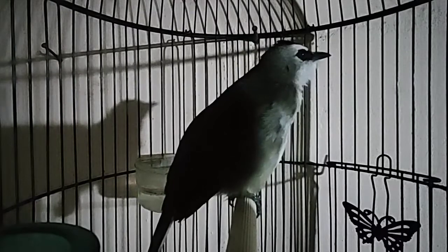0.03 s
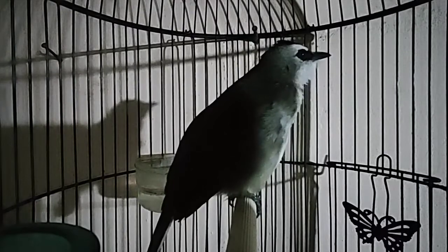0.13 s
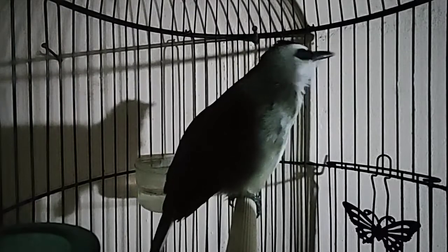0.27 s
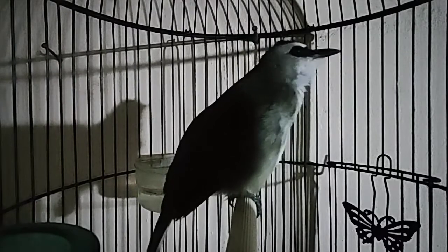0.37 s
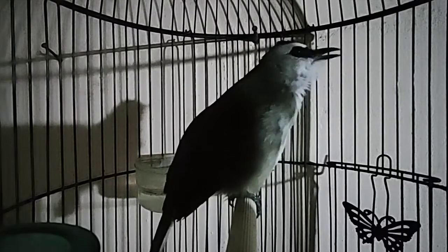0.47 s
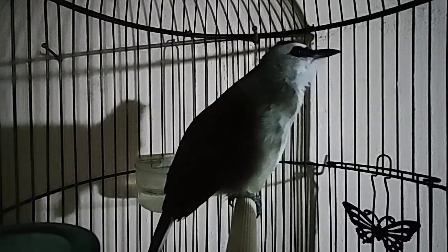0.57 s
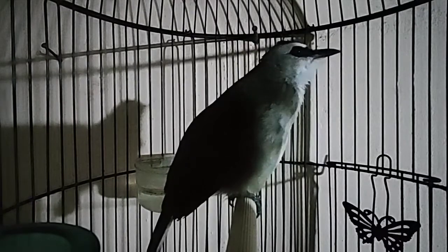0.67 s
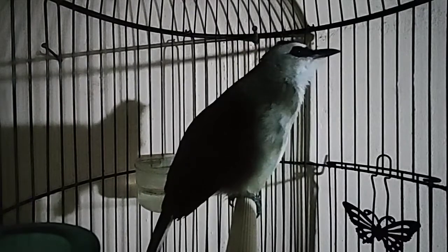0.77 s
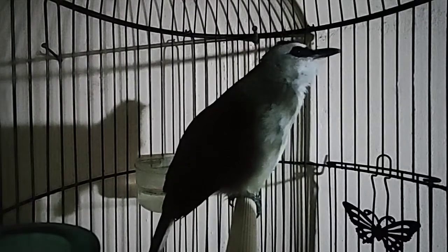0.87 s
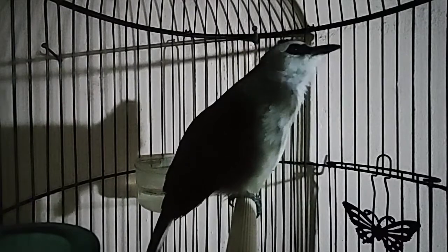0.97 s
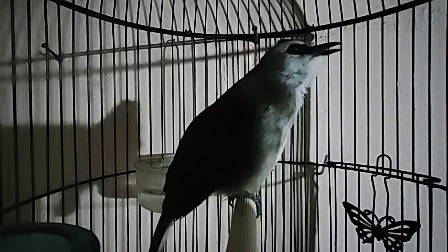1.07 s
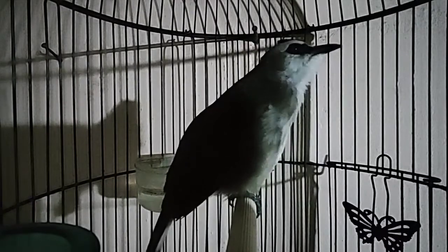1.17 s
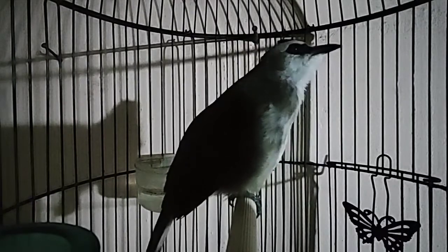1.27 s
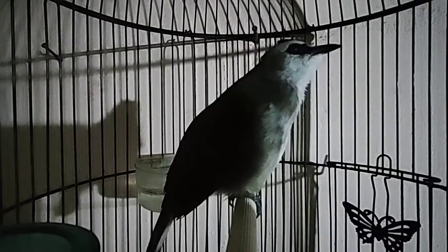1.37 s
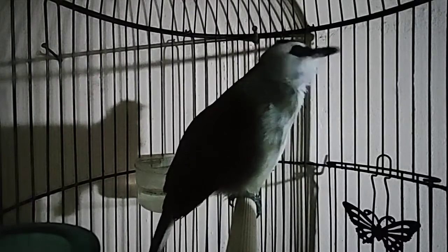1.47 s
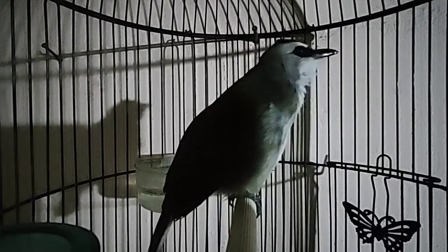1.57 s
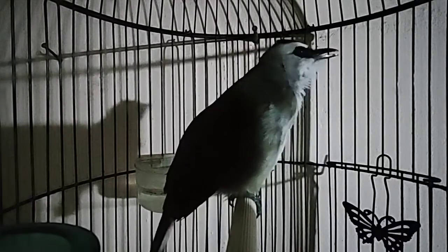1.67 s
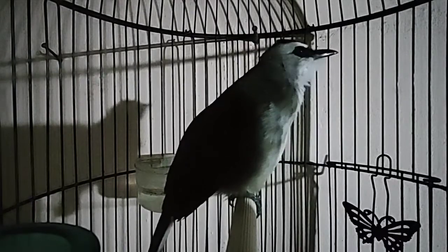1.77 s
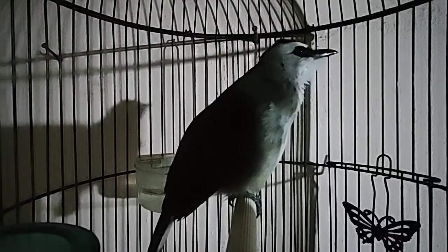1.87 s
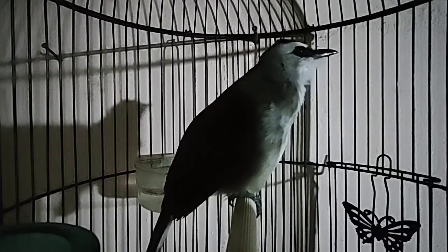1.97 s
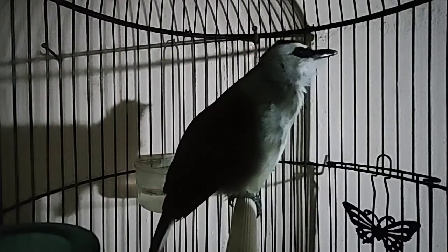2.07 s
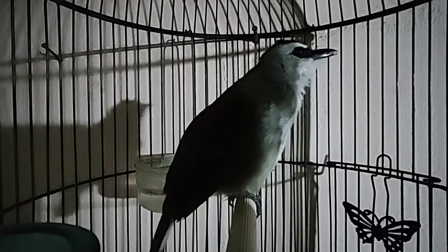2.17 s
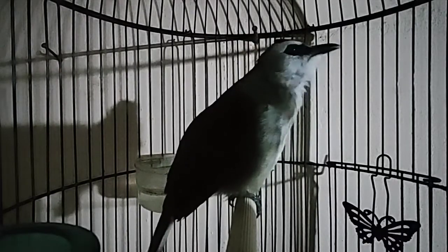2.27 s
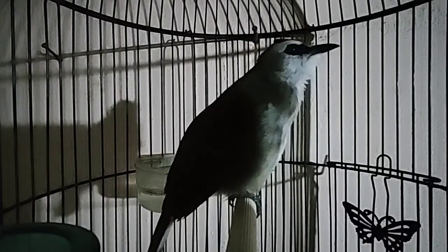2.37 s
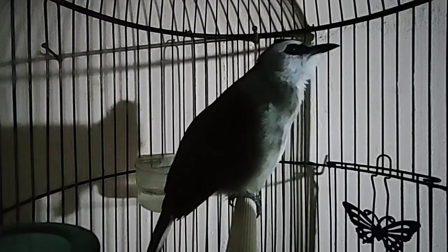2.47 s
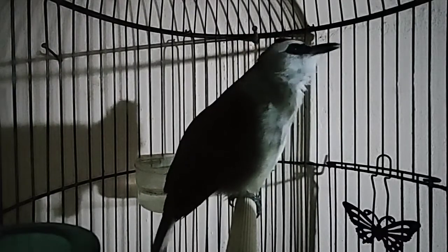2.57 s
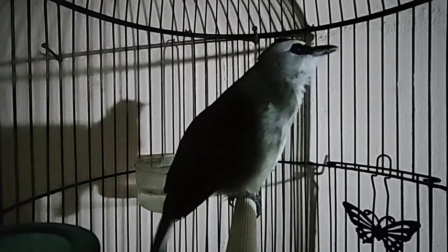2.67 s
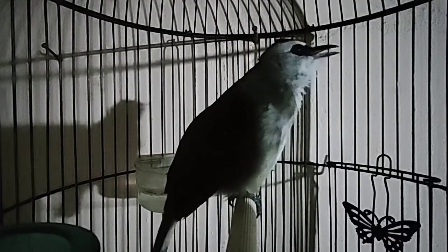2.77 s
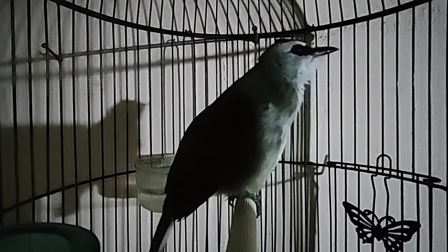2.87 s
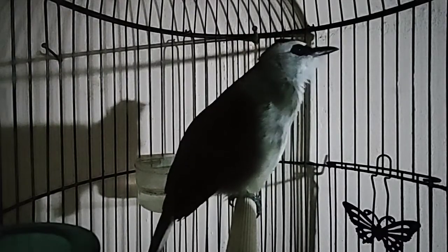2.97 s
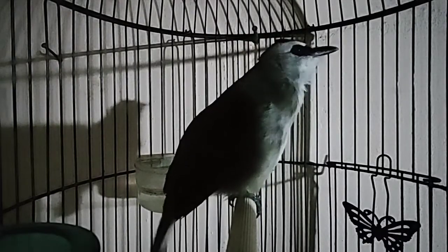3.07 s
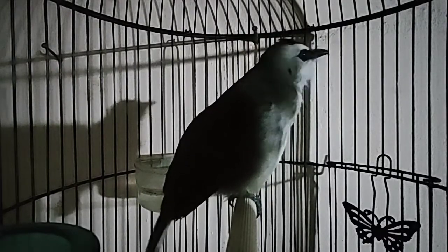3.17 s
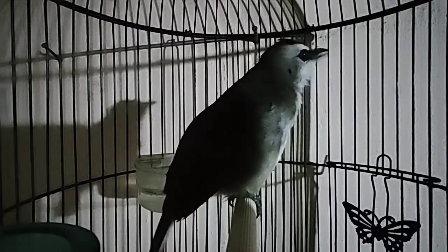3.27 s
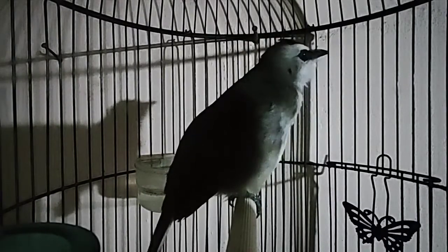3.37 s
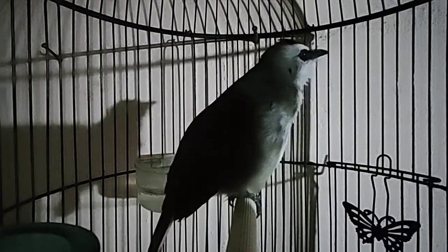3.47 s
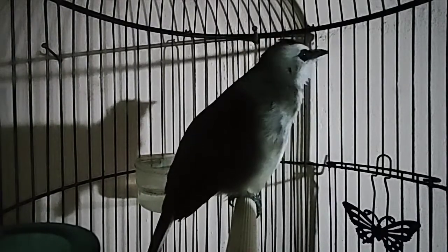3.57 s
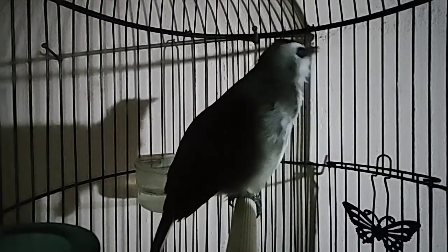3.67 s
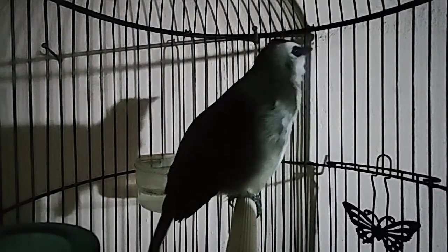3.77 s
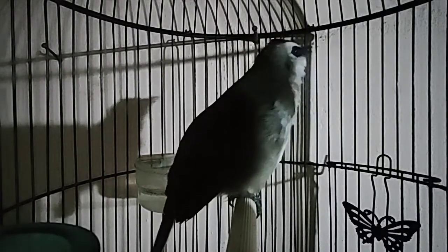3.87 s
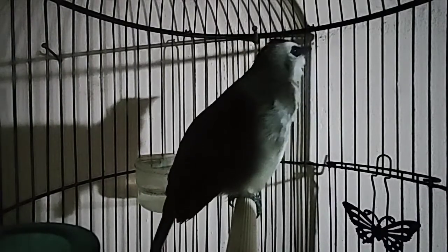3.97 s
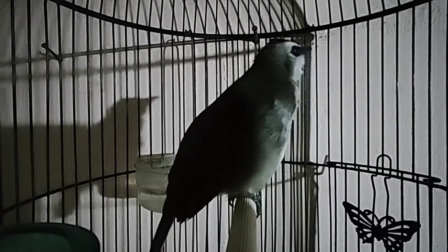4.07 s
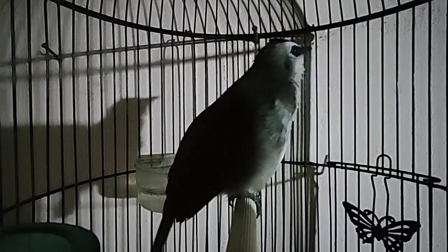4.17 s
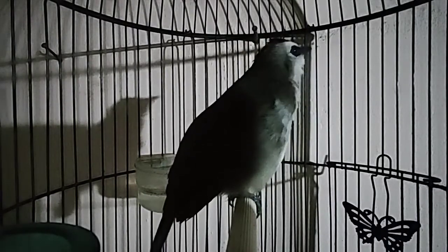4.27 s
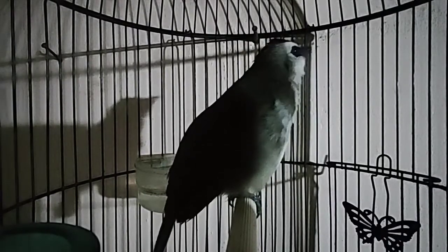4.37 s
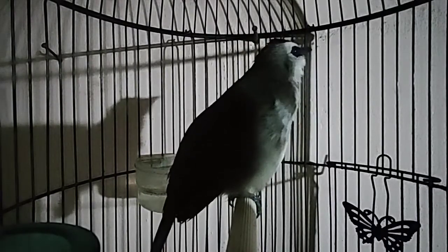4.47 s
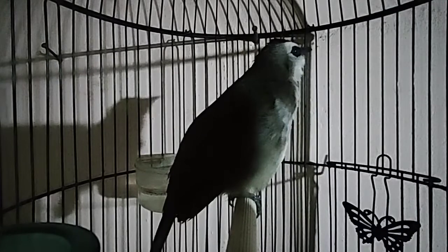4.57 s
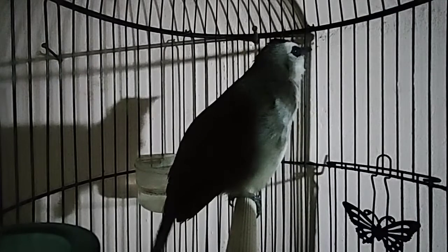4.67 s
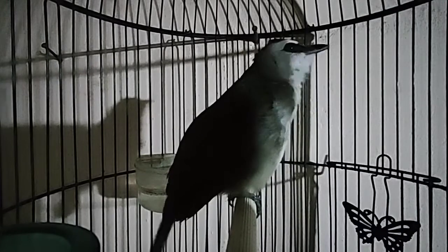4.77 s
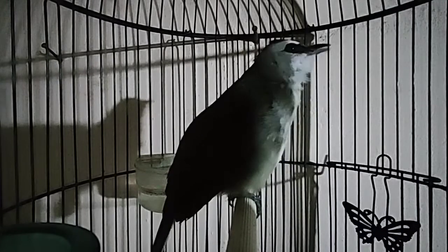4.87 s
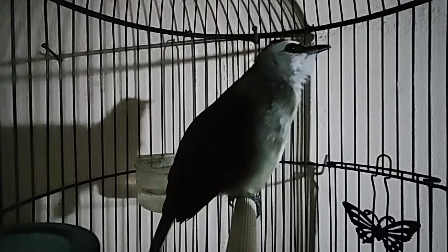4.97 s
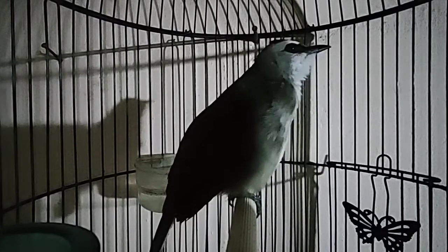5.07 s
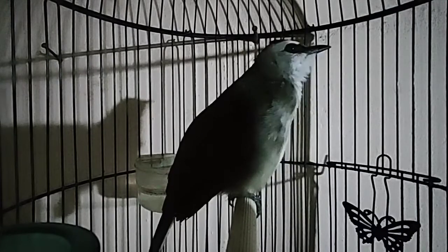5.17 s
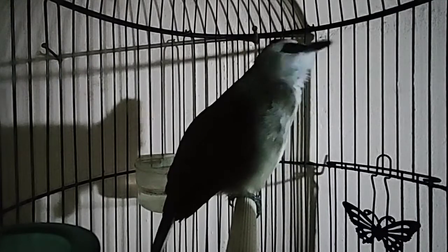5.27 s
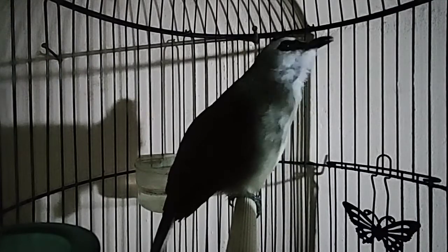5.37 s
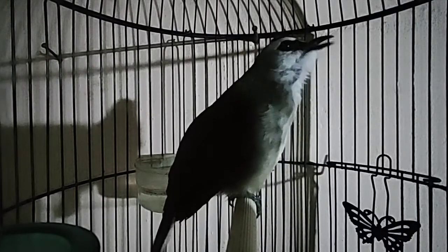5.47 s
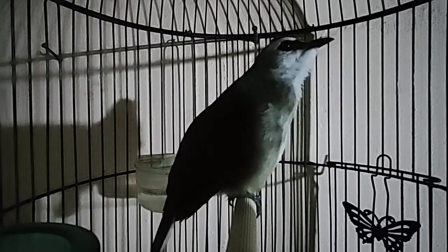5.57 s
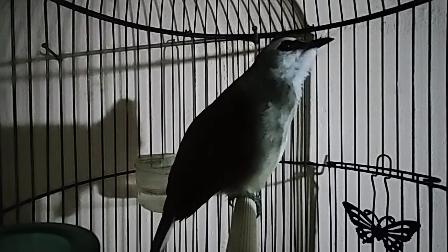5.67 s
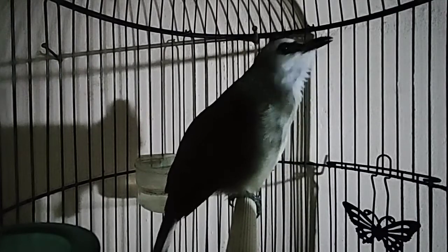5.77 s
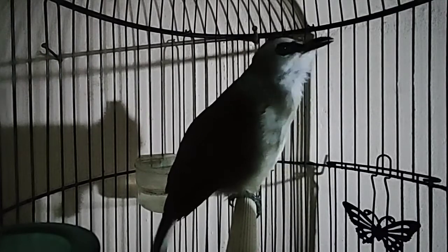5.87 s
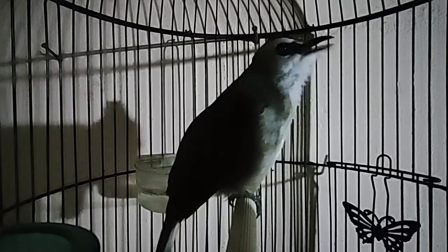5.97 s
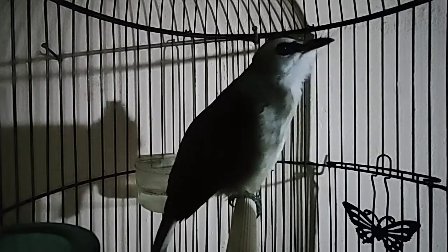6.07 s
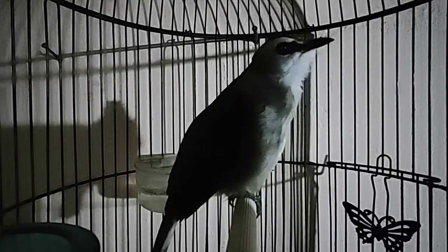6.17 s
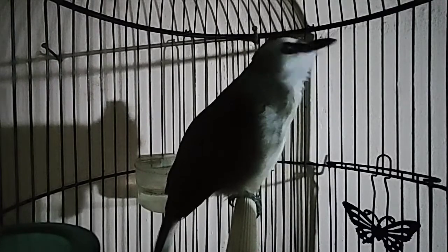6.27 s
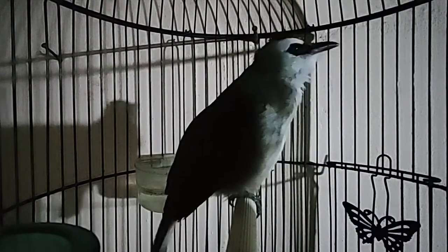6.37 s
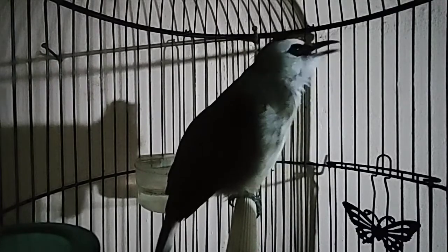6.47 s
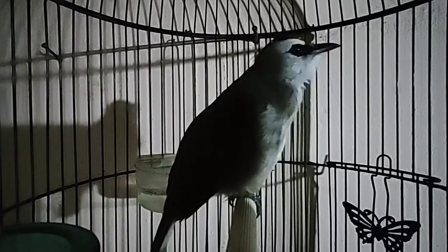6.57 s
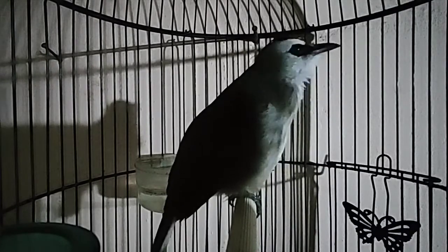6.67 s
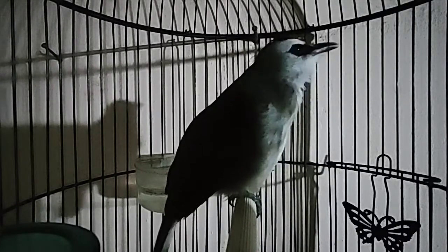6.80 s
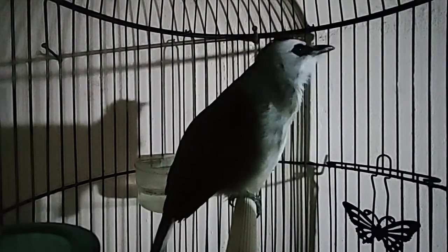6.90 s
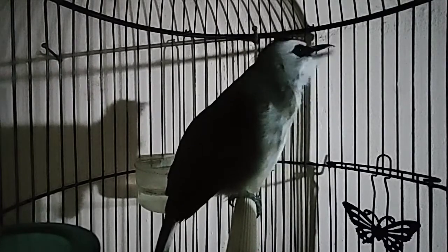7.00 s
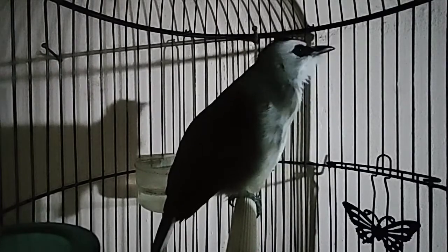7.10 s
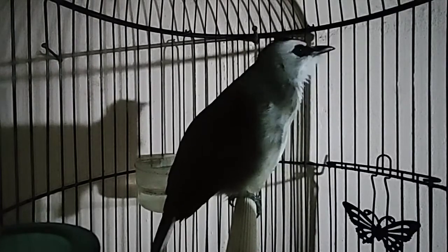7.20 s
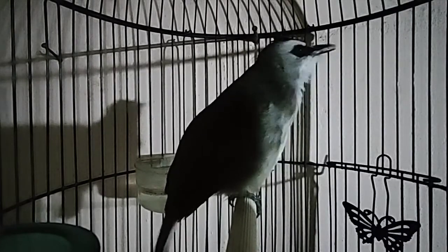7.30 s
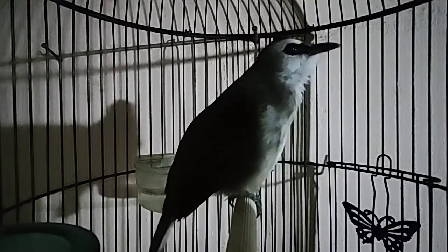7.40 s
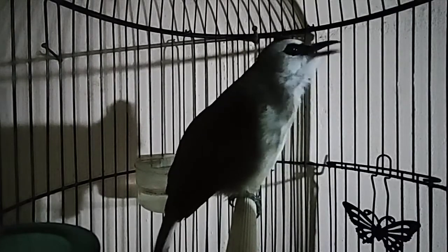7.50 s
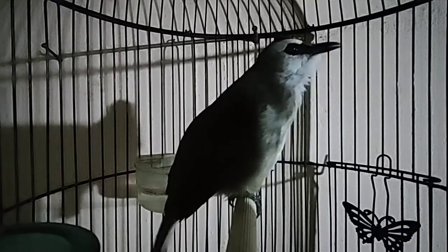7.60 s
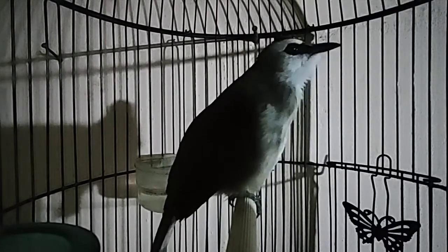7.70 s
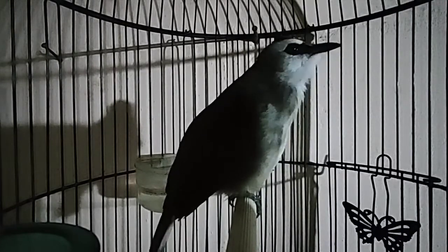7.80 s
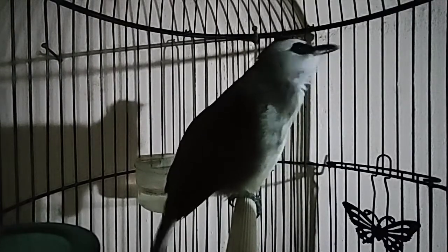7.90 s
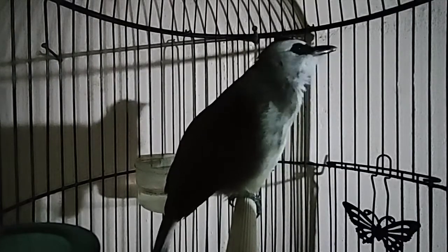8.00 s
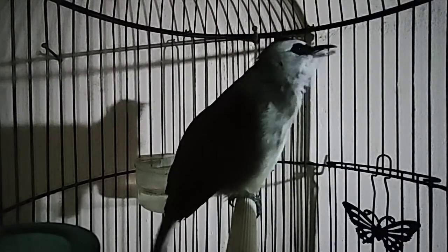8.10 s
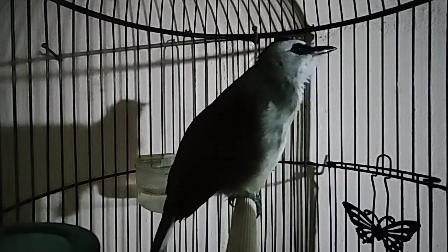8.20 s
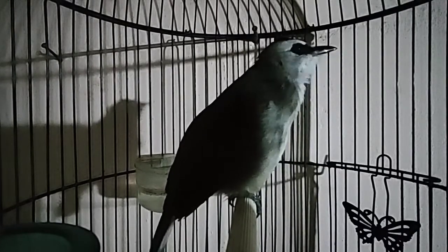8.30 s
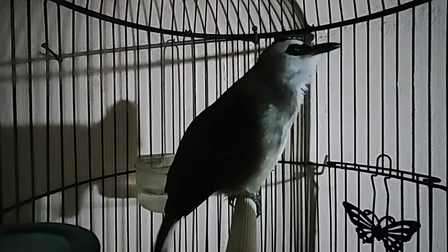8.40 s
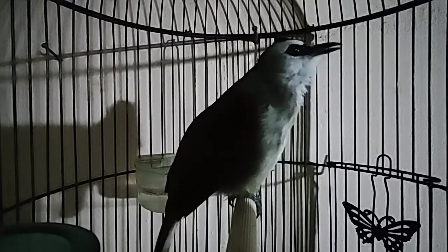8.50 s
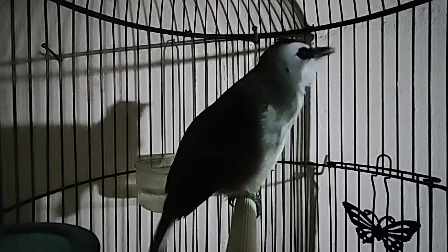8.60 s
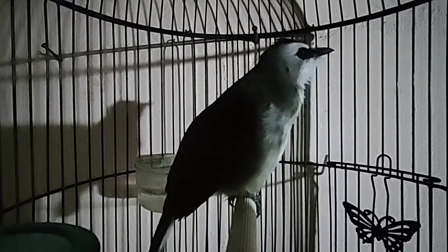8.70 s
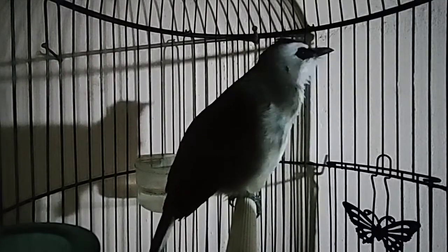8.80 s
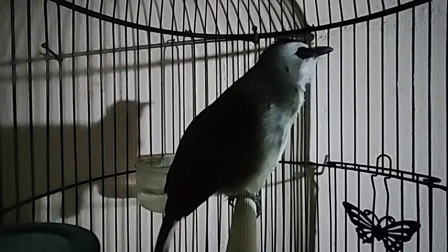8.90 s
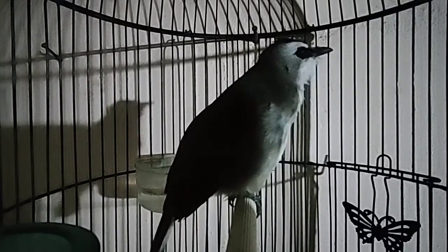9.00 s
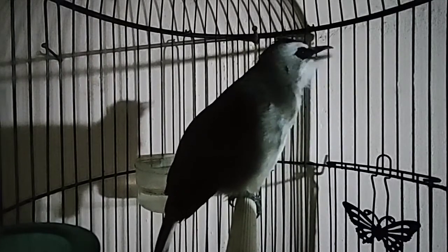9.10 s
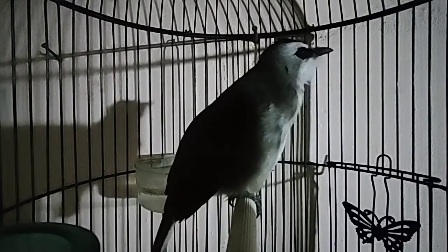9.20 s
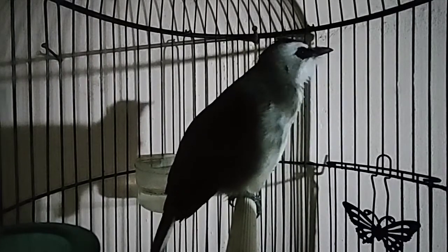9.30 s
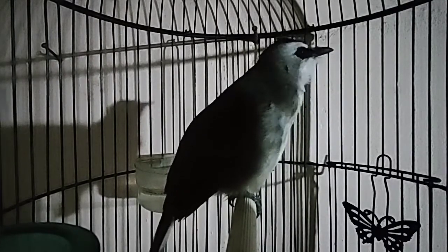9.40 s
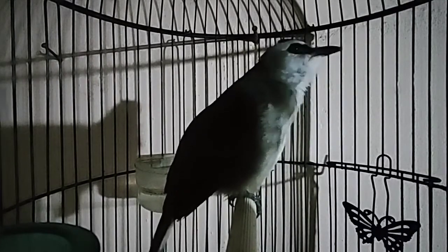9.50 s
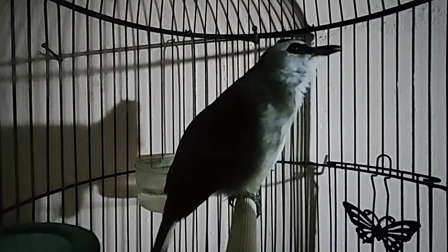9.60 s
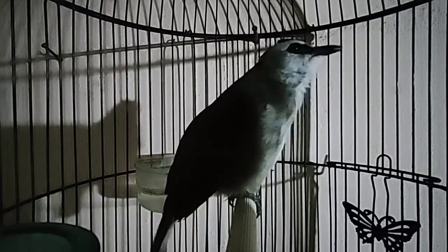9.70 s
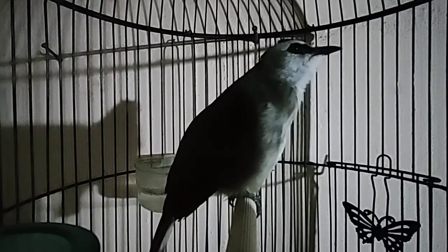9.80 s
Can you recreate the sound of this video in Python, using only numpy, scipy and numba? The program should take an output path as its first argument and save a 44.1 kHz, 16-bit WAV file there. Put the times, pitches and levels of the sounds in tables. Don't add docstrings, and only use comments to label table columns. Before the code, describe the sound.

A caged songbird sings very close to a phone in a bare room at night. A loud high whistle is already sounding, then softer low slurs and loud high notes alternate without a break, nearly four notes a second, each shaking into a quick warble. Beneath lie low hum, faint hiss and a single-cylinder motorbike thudding outside near one and three to four seconds.

```python
import sys
import numpy as np
from scipy import signal
from scipy.fft import rfft, irfft, next_fast_len
from scipy.io import wavfile
from scipy.ndimage import uniform_filter1d, minimum_filter1d
from numba import njit

SR = 44100
rng = np.random.default_rng(int(sys.argv[2]) if len(sys.argv) > 2 else 0)


def volts_from_db(level):
    exponent = np.asarray(level, float) / 20
    return 10 ** exponent


def master_out(mix):
    frames = np.transpose(np.atleast_2d(mix))
    ceiling = np.clip(frames, -1, 1)
    pcm = np.round(ceiling * 32767).astype(np.int16)
    wavfile.write(sys.argv[1], SR, pcm)


N = 434385

# pitch_hz, density_db (per Hz)
NIGHT_SPECTRUM = [(12, -28.5), (20, 1), (50, -3), (110, -7), (190, -15.5), (268, -12.5), (340, -24.5),
                  (480, -23), (900, -24), (2000, -26.5), (4200, -31.5), (6900, -32.5), (9000, -25),
                  (14400, -42.5)]
# pitch_hz, likeness (0-1)
STEREO_LIKENESS = [(60, 0.8), (270, 0.88), (560, 0.2), (5000, .05)]
# time_s, level_db
STREET_FADE = [
    (0, 0),
    (1.998, 2.5),
    (4, 2.5),
    (6, -3),
    (8, -1),
    (9.85, -2),
]
# time_s, firing_rate_hz, exhaust_thud_db, engine_drone_db
MOTORBIKE = [(0, 23.7, -53, -52), (.7, 26, -54, -46), (.8, 20.6, -36.5, -49), (0.998, 20.5, -41, -52),
             (1.3, 21.3, -40.5, -52), (1.6, 17, -51, -77), (2.65, 17.7, -57, -62), (3.0, 20.3, -35, -49),
             (3.9, 22, -37.5, -53), (4.398, 16.9, -44.5, -48), (4.801, 17.0, -54, -52.5),
             (5.5, 19.1, -58, -61.5), (7.2, 22, -60, -62.5), (7.701, 21, -50, -58),
             (9.85, 19.4, -69, -60.5)]
# pitch_hz, level_db (against the whistle)
OVERTONES = [(600, -25.5), (1100, -18), (2100, -8), (2700, -13.5), (3300, -20), (4400, -20.5), (5600, -21),
             (7200, -21), (8200, -8.5), (8800, 0.5), (10500, -1.5), (11400, -21.5), (11900, -47.5),
             (14200, -22.5)]
# pitch_hz, density_db (per Hz)
THROAT_AIR = [(500, -15.5), (800, -23.5), (1400, 16.5), (2300, 0.5), (4500, -7), (7000, -10.5),
              (8600, -22.5), (10800, -15), (11700, -41), (14500, -40.5)]
# time_s, overtone_lift_db
BEAK_FACING = [(0, -3), (1.2, -1.5), (2.4, -1), (4, -2), (6.1, 0), (7.1, -0.5), (7.7, 0.5), (8.6, 0),
               (9.3, -3), (9.85, -1.5)]
# start_s, level_db, held_pitch_hz, warble_length_s, settled_pitch_hz
LOW_HOLDS = [(0.397, -17, 1381, 0.026, 1345), (1.009, -20, 1397, 0.027, 1381),
             (1.599, -27, 1413, 0.024, 1396), (2.164, -20, 1403, 0.025, 1398),
             (2.71, -17.5, 1461, 0.035, 1484), (3.234, -14, 1443, 0.046, 1578),
             (3.804, -19.5, 1425, 0.036, 1409), (4.329, -22, 1402, 0.026, 1402),
             (4.846, -15, 1423, 0.032, 1372), (5.402, -22, 1463, 0.034, 1410),
             (5.92, -17, 1405, 0.033, 1389), (6.445, -16.5, 1390, 0.038, 1343),
             (6.953, -21.0, 1413, 0.024, 1390), (7.468, -19, 1484, 0.046, 1603),
             (7.977, -14.5, 1428, 0.031, 1422), (8.479, -14.5, 1453, 0.032, 1418),
             (9.022, -19.5, 1398, 0.024, 1344), (9.565, -20, 1480, 0.031, 1460)]
# start_s, end_s, warble_db, closing_db, warble_centre_hz
LOW_WARBLES = [(0.443, 0.495, -18.5, -19.5, 1472), (1.044, 1.1, -17, -18.5, 1718),
               (1.635, 1.696, -16.5, -17, 1545), (2.201, 2.25, -18.5, -18, 1705),
               (2.742, 2.804, -14, -21.5, 1776), (3.274, 3.335, -17.5, -13, 1713),
               (3.838, 3.907, -16, -19.0, 1794), (4.364, 4.407, -17, -19, 1577),
               (4.881, 4.945, -17, -15.5, 1726), (5.435, 5.492, -19, -17, 1759),
               (5.955, 6.012, -16, -18, 1699), (6.473, 6.542, -15.5, -21.5, 1701),
               (6.985, 7.04, -17.0, -20, 1495), (7.494, 7.554, -14, -13.0, 1745),
               (8.01, 8.056, -14.5, -15.5, 1707), (8.516, 8.575, -17, -18, 1700),
               (9.054, 9.098, -15, -21, 1407), (9.595, 9.652, -13.5, -18.5, 1741)]
# start_s, dip_s, swell_db, dip_db, pitch_hz
HIGH_HOLDS = [(-0.028, 0.038, -12.5, -18.5, 1877), (0.557, 0.609, -10, -18, 1864),
              (1.162, 1.229, -7.5, -33, 1867), (1.752, 1.812, -10, -19.5, 1881),
              (2.318, 2.369, -13, -18.5, 1899), (2.845, 2.903, -7.5, -13.5, 1873),
              (3.391, 3.446, -11.5, -58, 1884), (3.962, 4.014, -12, -46, 1885),
              (4.492, 4.536, -13.5, -26, 1844), (5.002, 5.058, -11.5, -6.5, 1852),
              (5.545, 5.599, -8, -68, 1895), (6.061, 6.115, -6.5, -10.5, 1828),
              (6.581, 6.636, -10, -11, 1869), (7.098, 7.157, -13.5, -14, 1843),
              (7.616, 7.671, -8, -14, 1897), (8.133, 8.188, -10.5, -18, 1847),
              (8.615, 8.669, -6.5, -18, 1940), (9.194, 9.254, -11.5, -25, 1810),
              (9.716, 9.776, -8, -12.5, 1897)]
# leap_s, end_s, level_db, warble_centre_hz, settled_pitch_hz
HIGH_WARBLES = [(0.041, 0.097, -8, 2150, 2143), (0.628, 0.683, -9, 2114, 2176),
                (1.2344, 1.304, -6.5, 1990, 2197), (1.823, 1.866, -9.5, 2170, 2189),
                (2.383, 2.434, -8.5, 2167, 2265), (2.916, 2.977, -5, 2143, 2103),
                (3.4628, 3.512, -7.5, 2114, 2110), (4.026, 4.091, -9.5, 2196, 2244),
                (4.551, 4.616, -9.5, 2032, 2146), (5.0705, 5.131, -5.5, 2130, 2106),
                (5.6194, 5.668, -6.5, 2106, 2160), (6.128, 6.194, -5, 2190, 2098),
                (6.65, 6.711, -4, 2006, 2201), (7.171, 7.217, -7, 2099, 2014),
                (7.6878, 7.745, -7, 2190, 2113), (8.204, 8.264, -7.0, 2105, 2173),
                (8.6853, 8.742, -3.5, 2160, 2141), (9.2582, 9.318, -6, 2237, 2189),
                (9.7895, 9.852, -6.5, 2088, 2092)]
# pitch_hz, lag_rad, level_db
LEFT_PORT = [(100, 0.57, -4), (1300, 0.45, 3.9), (2120, 0.35, 0.9), (5040, 1.66, 2.5), (6250, 2.3, -1.5),
             (11620, 1.4, 7)]
# delay_s, left_db, right_db
ECHOES = [
    (.0031, -19.5, -26),
    (.0068, -26.5, -20.5),
    (.0290, -18.5, -23.5),
]

WARBLE_HZ, WARBLE_SPREAD_HZ = 153, 13.3
LEAP_TURNS = 1.2
THROB_LAG_TURNS = 0.48
PAN_DB, PAN_SPREAD_DB = -1.8, -0.2
LOW_ENTRY_HZ, LOW_ARCH_HZ, HIGH_ARCH_HZ = 1518, 60, 17


def on_log(table, hz):
    table_hz, value = np.transpose(table)
    return np.interp(np.log(np.maximum(hz, 1)), np.log(table_hz), value)


def over_time(table, t):
    return np.interp(t, *np.transpose(table))


def shape(x, gain):
    size = next_fast_len(N + 4096)
    hz = np.arange(size // 2 + 1) * SR / size
    return irfft(rfft(x, size) * gain(hz), size)[..., :N]


def set_level(x, db):
    return x * volts_from_db(db) / np.sqrt(np.mean(x ** 2))


def walk(rate):
    hold = int(SR / rate)
    steps = np.repeat(rng.standard_normal(N // hold + 1), hold)
    slewed = uniform_filter1d(uniform_filter1d(steps, hold), hold)
    return set_level(slewed[:N], 0)


def night():
    def likeness(hz):
        return np.clip(on_log(STEREO_LIKENESS, hz), 0, .99)

    def mid_gain(hz):
        return volts_from_db(on_log(NIGHT_SPECTRUM, hz)) * np.sqrt(1 + likeness(hz))

    def side_gain(hz):
        return volts_from_db(on_log(NIGHT_SPECTRUM, hz)) * np.sqrt(1 - likeness(hz))

    mid = shape(rng.standard_normal(N), mid_gain)
    side = shape(rng.standard_normal(N), side_gain)
    bed = set_level(np.array([mid + side, mid - side]), -49)
    return bed * volts_from_db(0.4 * walk(0.77) + over_time(STREET_FADE, np.arange(N) / SR))


def motorbike():
    time_s, *columns = np.transpose(MOTORBIKE)
    firing_hz, thud_db, drone_db = (np.interp(np.arange(N) / SR, time_s, c) for c in columns)
    phase = 2 * np.pi * np.cumsum(firing_hz * (1 + .012 * walk(1.4))) / SR
    flicker, out = walk(2.6), 0
    for k in range(1, 11):
        thud = volts_from_db(thud_db - 2.5) / (1 + ((k * firing_hz - 64) / 19) ** 4)
        drone = volts_from_db(drone_db - 2.5) / (1 + ((k - 5.5) / 1.0) ** 4)
        uneven = volts_from_db(3.6 * np.roll(flicker, 30011 * k))
        out = out + (thud + drone) * uneven * np.sin(k * phase - .15 * k * k)
    return out


def low_slur(hold, warbling, chance):
    start, db, hz, length, settled = hold
    begin, end, warble_db, close_db, centre = warbling
    rate, lag, pan = chance
    breath = (start, begin - .008, begin - .004, end)
    warble = (begin - .002, length, WARBLE_HZ + WARBLE_SPREAD_HZ * rate, 162, warble_db)
    pitch = (LOW_ENTRY_HZ, .55 * LOW_ENTRY_HZ + .45 * hz, hz, centre - LOW_ARCH_HZ, centre + LOW_ARCH_HZ,
             centre - .6 * LOW_ARCH_HZ, settled + 24.2, settled - 77)
    voice = ((warble_db + close_db) / 2, close_db - 4, 0.8, THROB_LAG_TURNS + 0.18 * lag,
             -19.5, PAN_DB + PAN_SPREAD_DB * pan)
    return breath, (db, db), warble, pitch, voice


def high_note(hold, warbling, chance):
    start, dip, swell_db, dip_db, hz = hold
    leap, end, db, centre, settled = warbling
    rate, lag, pan = chance
    breath = (start, start + 0.41 * (dip - start), dip, end)
    warble = (leap - 0.00447, 0.0379, WARBLE_HZ + WARBLE_SPREAD_HZ * rate, 151, db - .4)
    pitch = (hz + 24.6, hz - 5, hz - 37.8, centre - HIGH_ARCH_HZ, centre + HIGH_ARCH_HZ,
             (centre + settled) / 2 - 21.8, settled, settled - 30.3)
    voice = (db - 3.0, db - 3.5, 0.58 * (1 + .35 * pan), THROB_LAG_TURNS + 0.19 * lag,
             -16, PAN_DB + PAN_SPREAD_DB * pan)
    return breath, (swell_db, dip_db - 5.5), warble, pitch, voice


def phrases():
    chance = iter(rng.standard_normal((40, 3)))
    for hold, warbling in zip(LOW_HOLDS, LOW_WARBLES):
        yield True, low_slur(hold, warbling, next(chance))
    for hold, warbling in zip(HIGH_HOLDS, HIGH_WARBLES):
        yield False, high_note(hold, warbling, next(chance))


def whistle_control(t, breath, levels, warble, pitch, voice):
    (start, swell, dip, end), (swell_db, dip_db) = breath, levels
    begin, length, rate, swing, warble_db = warble
    after_db, close_db, throb, lag = voice[:4]
    turn = 2 * np.pi * rate * (t - begin)
    onset = np.clip(turn / (2 * np.pi * LEAP_TURNS), 0, 1)
    shake = onset * (1 - np.clip((t - begin) / length, 0, 1) ** 3)

    times = [start, .35 * start + .65 * begin, begin, begin + LEAP_TURNS / rate,
             begin + 0.42 * length, begin + 0.64 * length, begin + length, end]
    hz = np.interp(t, times, pitch) - 1.143 * swing * shake * np.cos(turn)
    hz = uniform_filter1d(hz, size=70)

    half_top = .012 / 2
    times = [start - .001, swell - half_top, min(swell + half_top, dip), dip, begin,
             begin + 0.47 * length, begin + length, end - 0.0074, end + 0.0012]
    points_db = np.array([swell_db - 1.5, swell_db, dip_db, warble_db, warble_db, after_db, close_db])
    bulge = 0.96
    gains = [0, *volts_from_db(points_db) ** bulge, 0]
    pressure = np.interp(t, np.maximum.accumulate(times), gains) ** (1 / bulge)
    pressure = uniform_filter1d(pressure, size=220)
    throbbing = 1 + 0.61 * throb * shake * np.cos(turn - 2 * np.pi * lag)
    return hz, pressure * np.maximum(throbbing, 0), shake


def bird():
    sound, pan_db = np.zeros(N), np.zeros(N)
    wobble, flicker, drift = walk(180), walk(260), walk(45)
    air = shape(rng.standard_normal(N), lambda hz: volts_from_db(on_log(THROAT_AIR, hz)))
    air = set_level(air, 0)
    dull_band = signal.butter(2, (915, 1750), "band", fs=SR, output="sos")
    dull_noise = set_level(signal.sosfilt(dull_band, rng.standard_normal(N)), 0)
    for low, settings in phrases():
        breath, voice = settings[0], settings[-1]
        start, end = breath[0], breath[3]
        span = slice(max(int((start - .03) * SR), 0), min(int((end + .02) * SR), N))
        t = np.arange(span.start, span.stop) / SR
        hz, pressure, shake = whistle_control(t, *settings)
        half_db, rasp_db, blur, air_db, dull_db = (-5, 11.5, 1.2, -24, -48.5) if low else (-9, 4, .9, -44.5, -52.1)
        hz = hz * (1 + (0.008 + 0.0063 * low + 0.015 * shake) * wobble[span] + 0.00605 * drift[span])
        pressure = pressure * (1 + .16 * low * flicker[span])
        phase = 2 * np.pi * np.cumsum(hz) / SR

        overtones = 0
        for k in np.r_[1, 3:22]:
            partial_hz = k * hz / 2
            db = on_log(OVERTONES, partial_hz) + half_db * (k % 2)
            db = db + rasp_db * np.clip((8000 - partial_hz) / 1500, 0, 1)
            db = db + 3.7 * np.roll(flicker, 5003 * k)[span]
            wander = blur * (.6 + k / 14) * np.roll(wobble, 7001 * k)[span]
            audible = k * hz < 29000
            overtones = overtones + volts_from_db(db) * audible * np.sin(k * phase / 2 + k * k + wander)

        dull_times = [start - 0.02 - .003, start - 0.02, end, end + 0.0053]
        dull_gain = volts_from_db(dull_db) * np.interp(t, dull_times, [0, 1, 1, 0])
        rush_gain = volts_from_db(air_db) * pressure * (1 + shake)
        overtone_gain = volts_from_db(voice[4] + over_time(BEAK_FACING, t))
        sound[span] += pressure * (np.sqrt(2) * np.sin(phase) + overtone_gain * overtones)
        sound[span] += rush_gain * air[span] + dull_gain * dull_noise[span]
        pan_db[span] = voice[5]
    return sound, pan_db


@njit
def bare_room(x, lags, gain, damp):
    line, soft, out = np.zeros((8, 4096)), np.zeros(8), np.zeros((2, len(x)))
    for i in range(len(x)):
        total = 0.
        for k in range(8):
            soft[k] += (1 - damp) * (gain[k] * line[k, (i - lags[k]) & 4095] - soft[k])
            total += soft[k]
            out[k % 2, i] += soft[k] * (1 - (k & 2))
        for k in range(8):
            line[k, i & 4095] = x[i] + soft[k] - total / 4
    return out


def song_in_room():
    song, pan_db = bird()
    port_hz, lag, db = np.transpose(LEFT_PORT)

    def port_gain(hz):
        return volts_from_db(np.interp(hz, port_hz, db)) * np.exp(-1j * np.interp(hz, port_hz, lag))

    out = np.array([shape(song, port_gain), song]) * volts_from_db(np.array([pan_db, -pan_db]) / 2)
    for delay_s, left_db, right_db in ECHOES:
        late = np.r_[np.zeros(int(delay_s * SR)), song][:N]
        out = out + np.array([volts_from_db(left_db) * late, volts_from_db(right_db) * np.roll(late, 3)])
    lags = rng.integers(500, 2200, 8)
    t60_s = 0.49
    tail = bare_room(song, lags, volts_from_db(-60 * lags / SR / t60_s), 0.029)
    return out + volts_from_db(-18.5) * tail


def scene():
    return night() + motorbike() + song_in_room()


def treble_gate(x):
    hz, _, frames = signal.stft(x, SR, "cosine", nperseg=1024)
    band = 12
    power = uniform_filter1d(np.abs(frames) ** 2, size=band, axis=1)[:, ::band].mean(axis=0)
    threshold_db = -47 + 3 * rng.standard_normal(power.shape)
    limit = power.max(axis=0) * volts_from_db(threshold_db) ** 2
    keep = np.repeat(power > limit, band, axis=0)[:len(hz)] | (hz[:, None] < 2600)
    return signal.istft(frames * keep, SR, "cosine", nperseg=1024)[1][:, :N]


def low_pass(x):
    return signal.sosfilt(signal.butter(12, 14500, fs=SR, output="sos"), x)


def record(dry):
    headroom = np.minimum(.98 / (np.abs(dry).max(axis=0) + 1e-9), 1)
    gain = uniform_filter1d(minimum_filter1d(headroom, size=120), size=160)
    mix = treble_gate(np.clip(dry * gain, -1, 1))
    return low_pass(mix)


dry = scene()
out = record(dry)
master_out(out)
```